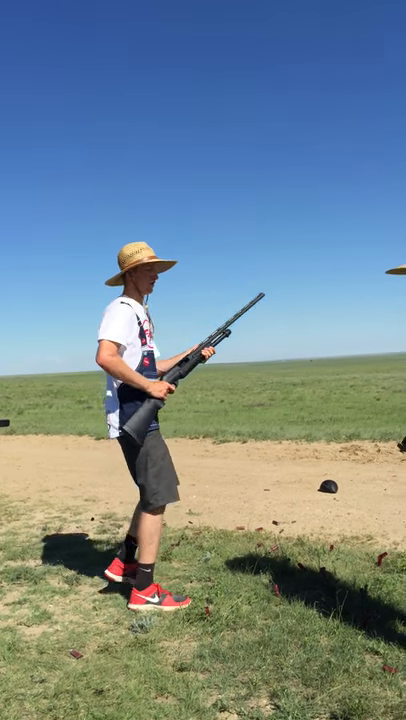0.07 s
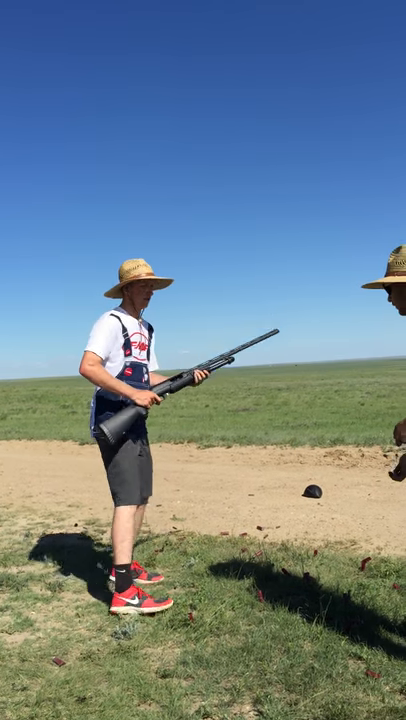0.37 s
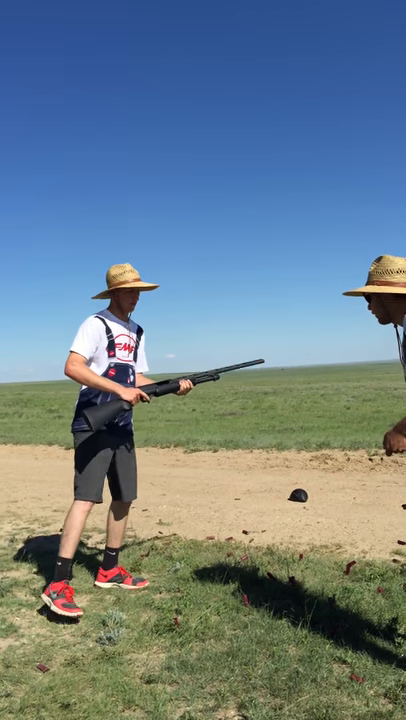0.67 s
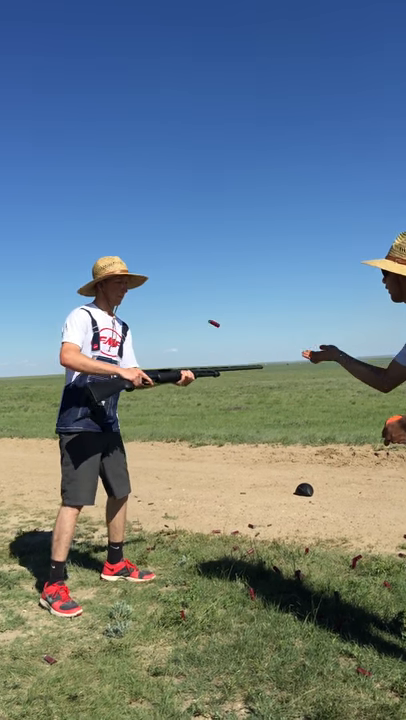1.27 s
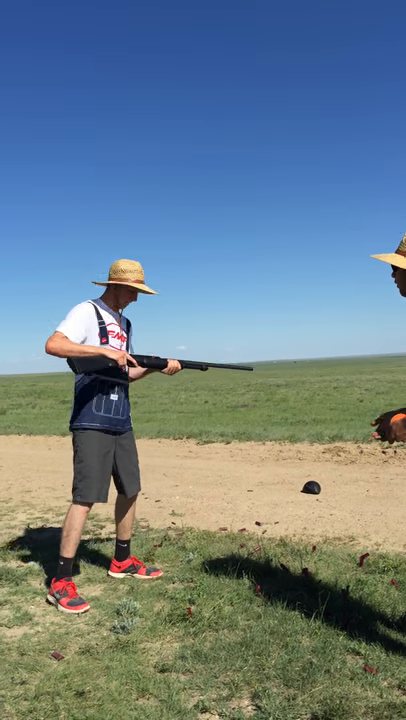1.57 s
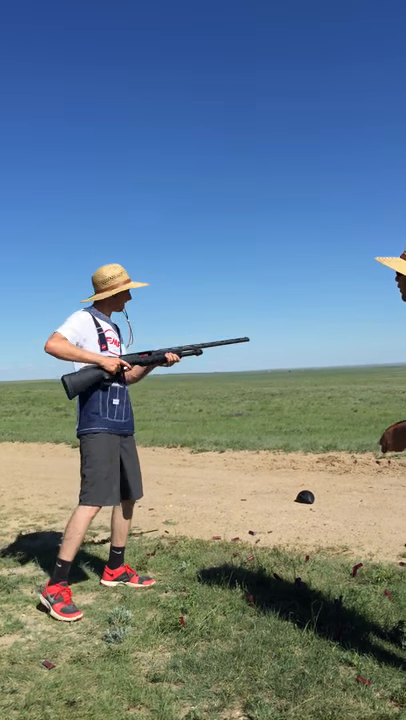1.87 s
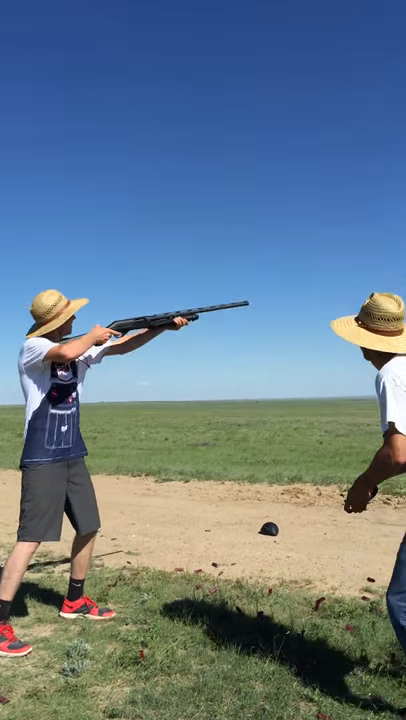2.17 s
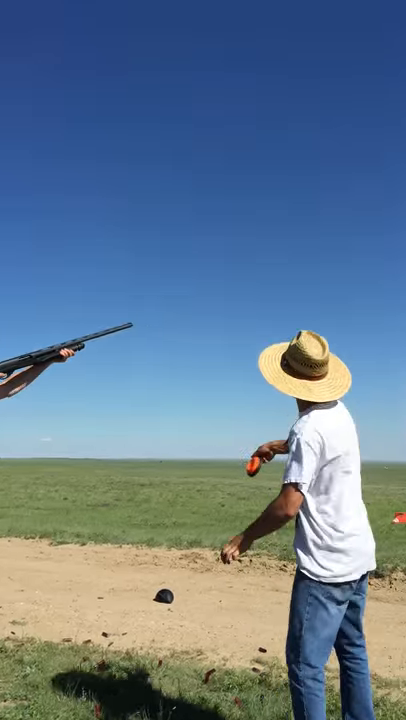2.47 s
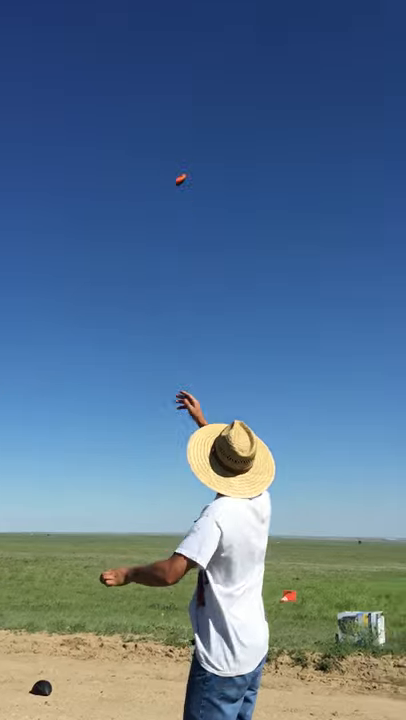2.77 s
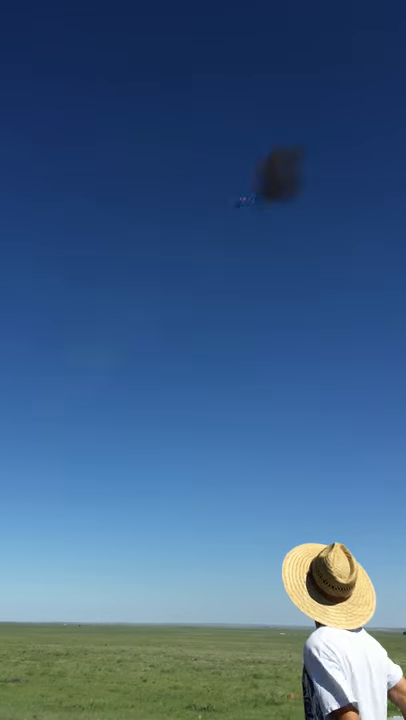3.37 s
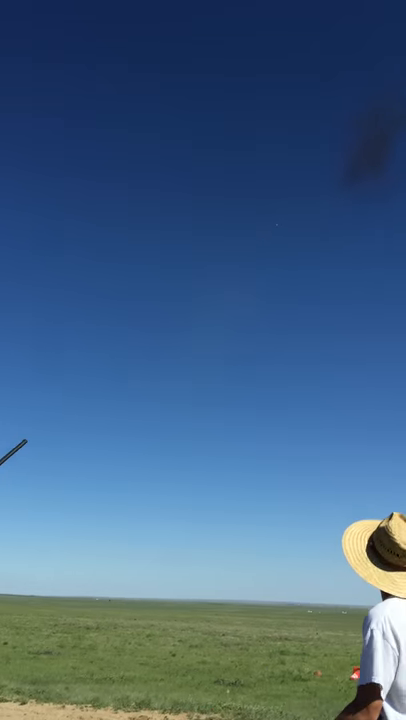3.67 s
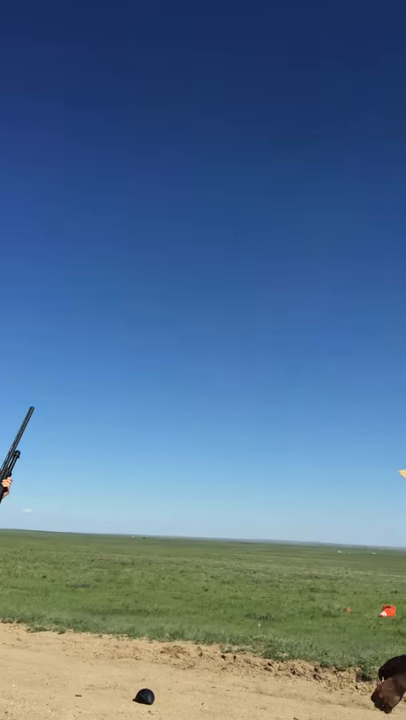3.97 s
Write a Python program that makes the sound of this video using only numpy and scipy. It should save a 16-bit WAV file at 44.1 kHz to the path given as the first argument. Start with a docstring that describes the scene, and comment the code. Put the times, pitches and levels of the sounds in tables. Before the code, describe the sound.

A single shotgun blast overloads a microphone a few steps away in an open field. Low wind gusts come first, then loading clicks and a sharp metal clack, a pause, and the shot with its faint echo.

```python
"""Open grassland: a shotgun is loaded and fired a few steps from a small microphone.
Wind buffets the microphone throughout; shoes and sleeves rustle. A plastic shell scrapes and clacks into
the port, the bolt slides forward and slams shut with a short steel ring. One shot overloads the
microphone, and its echo drifts back over the field, losing treble to the air."""
import sys
import numpy as np
from scipy import signal
from scipy.fft import rfft, irfft
from scipy.io import wavfile
from scipy.ndimage import uniform_filter1d, map_coordinates

SR = 44100
rng = np.random.default_rng(int(sys.argv[2]) if len(sys.argv) > 2 else 0)


def materialize(psi):
    """Save the field psi as 16-bit PCM at rate SR to the path in sys.argv[1].

    A 1-D psi becomes a single channel; in a 2-D psi each row is a channel.
    """
    bounded = np.clip(np.atleast_2d(psi).T, -1, 1)
    quanta = np.round(bounded * 32767).astype(np.int16)
    wavfile.write(sys.argv[1], SR, quanta)


N = 176400
TIME_S = np.arange(N) / SR
STRIKE_TIME_S = np.arange(SR // 2) / SR


def amp(db):
    """Decibels to gain."""
    return 10 ** (np.asarray(db) / 20)


def unit(x):
    """Scale to rms 1."""
    return x / np.sqrt(np.mean(x ** 2) + 1e-20)


def curve(rows):
    """Gain per sample from rows of time_s, level_db."""
    return amp(np.interp(TIME_S, *np.transpose(rows)))


def wobble(rate_hz):
    """Smooth random curve with knots at rate_hz."""
    knots = rng.standard_normal(int(N * rate_hz / SR) + 4)
    return map_coordinates(knots, [TIME_S * rate_hz])


def noise(spectrum, tilt_db_per_oct=0, pivot_hz=1000, size=N):
    """Noise of rms 1 from rows of freq_hz, level_db, tilted above the pivot."""
    octave = np.log2(np.fft.rfftfreq(size, 1 / SR) + 1)
    freq_hz, level_db = np.transpose(spectrum)
    shape_db = np.interp(octave, np.log2(freq_hz), level_db)
    tilt_db = tilt_db_per_oct * np.maximum(octave - np.log2(pivot_hz), 0)
    return unit(irfft(rfft(rng.standard_normal(size)) * amp(shape_db + tilt_db), size))


def swell(peak_s, half_width_s):
    """Gaussian envelope."""
    return np.exp(-((TIME_S - peak_s) / half_width_s) ** 2)


def burst(peak_s, rise_db_per_s, fall_db_per_s, hold_s=0):
    """Rise, hold, fall envelope."""
    t = TIME_S - peak_s
    return amp(rise_db_per_s * np.minimum(t, 0) - fall_db_per_s * np.maximum(t - hold_s, 0))


def decay(t60_s):
    """Exponential decay after a strike."""
    return 1000 ** (-STRIKE_TIME_S / t60_s)


def partial(pitch_hz, level_db):
    """Sine with random phase and slight level spread."""
    gain = amp(level_db + rng.normal(0, 1.3))
    return gain * np.sin(2 * np.pi * (pitch_hz * STRIKE_TIME_S + rng.random()))


def add(out, start_s, x):
    """Mix x into out at start_s."""
    i = round(start_s * SR)
    out[i:i + len(x)] += x[:max(N - i, 0)]


# Wind strength, three spans before the shot and one after: time_s, level_db
EARLY_GUSTS = [
    [(0.0, -26), (0.174, -16), (0.386, -37), (0.408, -16), (0.456, -28), (0.486, -15.5), (0.6, -33),
     (0.658, -23), (0.86, -35.5), (0.946, -26.5), (0.974, -40.5), (1.064, -24), (1.09, -37), (1.228, -27.5),
     (1.324, -57), (1.344, -35), (1.4, -47)],
    [(1.42, -42), (1.448, -33), (1.61, -21), (1.666, -30), (1.726, -17), (1.802, -33), (1.848, -18.5),
     (1.928, -21), (1.948, -32), (2.002, -25), (2.104, -26), (2.154, -35.5), (2.246, -25.5), (2.274, -32),
     (2.35, -23), (2.408, -49), (2.44, -46)],
    [(2.46, -32), (2.48, -27.5), (2.52, -38.5), (2.564, -27), (2.592, -40.5), (2.624, -30), (2.734, -52),
     (2.826, -37), (2.926, -57.5), (2.962, -39), (3.05, -60), (3.086, -37), (3.148, -29), (3.232, -42),
     (3.296, -30), (3.314, -38), (3.38, -42)],
]
LATE_GUSTS = [(3.55, -40.5), (3.62, -51), (3.65, -42.5), (3.72, -50.5), (3.775, -42), (3.82, -49.5),
              (3.88, -41), (3.94, -40), (4, -48)]
# Wind spectra: freq_hz, level_db
RUMBLE_SPECTRUM = [(20, -28), (40, -7), (62, 1), (100, -1), (160, -10), (230, -21), (330, -40), (550, -68),
                   (1500, -100), (4000, -120)]
FLUTTER_SPECTRUM = [(60, -16), (170, -0.5), (250, -3), (380, -19.5), (600, -45), (1200, -80), (4000, -120)]
AIR_SPECTRUM = [(410, -29), (700, 0.5), (3900, -5), (4920, -8), (6520, -9), (12100, -13.5), (15000, -18.5)]


def wind(flutter_db=-42.5, flutter_depth_db=5.5, air_db=-71):
    """Low buffeting on the microphone, fluttering harder in gusts, over faint open-air hiss."""
    strength = curve(np.concatenate([*EARLY_GUSTS, LATE_GUSTS]))
    rumble = noise(RUMBLE_SPECTRUM)
    local_power = np.abs(uniform_filter1d(rumble ** 2, size=3000))
    steady_rumble = unit(rumble / np.sqrt(local_power + 0.1))
    flicker = amp(flutter_depth_db * np.tanh(wobble(45)))
    flutter = unit(strength ** 1.35 * flicker * noise(FLUTTER_SPECTRUM))
    return strength * steady_rumble + amp(flutter_db) * flutter + amp(air_db) * noise(AIR_SPECTRUM)


# Wind eddies: peak_s, level_db, half_width_s, tilt_db_per_oct
EDDY_PUFFS = [(0.009, -32, 0.01, -1.5), (0.068, -27, 0.004, 1.5), (0.089, -20.5, 0.0051, -2),
              (0.137, -21, 0.0025, 7.5), (0.153, -26, .024, -5), (0.261, -33, 0.014, -5.5),
              (0.423, -24, 0.0045, 2), (0.586, -30.5, .012, -3), (0.651, -41, 0.0063, -2),
              (0.684, -40.5, 0.0086, -7.5), (0.725, -33, 0.0044, -24), (0.774, -29.5, .006, -7.5),
              (0.801, -31, 0.012, -5.5), (0.932, -30, 0.0067, -11.5), (1.47, -40.5, 0.032, -5),
              (1.541, -36.5, 0.01, -5), (1.596, -28, 0.0051, -6.5), (1.684, -27.5, 0.0093, -1.5),
              (1.708, -41, 0.0058, 3), (1.912, -22, 0.0049, -2), (1.991, -23.5, 0.0047, 1),
              (2.033, -20, .012, -1.5), (2.178, -30, 0.0055, 3), (2.197, -29.5, 0.01, 3.5),
              (2.227, -22.5, 0.0078, 1), (2.239, -16.5, 0.0071, -0.5), (2.316, -32, 0.01, 7),
              (2.347, -27.5, 0.019, 1.5), (2.465, -39.5, 0.0085, -9), (2.561, -28, 0.0037, -6.5),
              (2.622, -35.5, 0.0049, -2), (3.131, -34, 0.0044, -12), (3.158, -31, 0.0048, -8),
              (3.291, -37, 0.012, -1)]
# Eddy spectrum: freq_hz, level_db
EDDY_SPECTRUM = [(40, -21.5), (120, -3), (250, 1), (450, -7), (650, -20), (1000, -38), (2000, -72),
                 (5000, -125)]


def eddies():
    """Sharp eddies hit the microphone as brief puffs, brighter than the rumble."""
    out = np.zeros(N)
    for peak_s, level_db, half_width_s, tilt_db_per_oct in EDDY_PUFFS:
        envelope = swell(peak_s, half_width_s)
        turbulence = noise(EDDY_SPECTRUM, tilt_db_per_oct, pivot_hz=314, size=16384)
        puff = envelope * np.resize(turbulence, N)
        out += amp(level_db) * puff * np.linalg.norm(envelope) / np.linalg.norm(puff)
    return out


# Steps, sleeves, dry ticks: peak_s, level_db, half_width_s, resonance_hz
RUSTLE_EVENTS = [(0.322, -53, 0.0047, 1700), (0.51, -68.5, 0.047, 3380), (0.529, -46.5, 0.0014, 3200),
                 (2.358, -60, 0.035, 10100), (2.787, -50.5, 0.0033, 3000), (2.822, -51.5, 0.0033, 2210),
                 (2.877, -52, 0.027, 1284), (2.97, -59.5, 0.031, 1597), (3.302, -34, .0012, 3160),
                 (3.349, -59.5, 0.089, 3020)]
# Brushing spectrum: freq_hz, level_db
BRUSH_SPECTRUM = [(200, -13), (800, 3.5), (1700, 0.5), (4000, -2.5), (7000, -8.5), (11000, -10),
                  (15000, -13.5)]


def rustles(rough_db=4, resonance_db=8.5, resonance_width_oct=0.3):
    """Shoes in dry grass, moving clothes and small ticks, each with one broad resonance."""
    freq_hz = np.geomspace(200, 15000, num=60)
    brush_hz, brush_db = np.transpose(BRUSH_SPECTRUM)
    base_db = np.interp(np.log(freq_hz), np.log(brush_hz), brush_db)
    grain = unit(amp(rough_db * np.tanh(wobble(700))))
    out = np.zeros(N)
    for peak_s, level_db, half_width_s, resonance_hz in RUSTLE_EVENTS:
        bump_db = resonance_db * np.exp(-(np.log2(freq_hz / resonance_hz) / resonance_width_oct) ** 2)
        spectrum = np.column_stack([freq_hz, base_db + bump_db])
        out += amp(level_db) * swell(peak_s, half_width_s) * noise(spectrum)
    return grain * out


# Shell friction: time_s, level_db
SHELL_LEVEL = [(1.62, -81), (1.65, -58), (1.7, -66), (1.73, -60), (1.78, -71), (1.83, -60.5), (1.87, -48),
               (1.91, -58), (1.95, -75)]
# Shell spectrum: freq_hz, level_db
SHELL_SPECTRUM = [(400, -30), (750, -12), (950, -3), (1200, -8), (1600, 0), (2100, -9), (2600, 1),
                  (3200, -11), (6000, -14), (14000, -28)]


def shell_scrape(rough_db=4.5):
    """The plastic shell rubs into the port."""
    return curve(SHELL_LEVEL) * unit(noise(SHELL_SPECTRUM) * amp(rough_db * wobble(200)))


# Bolt friction: time_s, level_db
BOLT_LEVEL = [(1.62, -89), (1.65, -59.5), (1.78, -71.5), (1.87, -53), (1.93, -64), (1.955, -51.5),
              (1.975, -36), (2.01, -34.5), (2.04, -29), (2.075, -34.5), (2.11, -57), (2.2, -67), (2.3, -92)]
# Metal contact spectrum, sliding or struck: freq_hz, level_db
CONTACT_SPECTRUM = [(200, -19.5), (700, -8.5), (1400, -2), (2600, 0), (4500, -3.5), (6500, -4),
                    (9000, -6.5), (15000, -18.5)]


def bolt_slide(rough_db=4):
    """Steel catches on steel, louder as the bolt gathers speed."""
    friction = noise(CONTACT_SPECTRUM, tilt_db_per_oct=-3.5)
    return curve(BOLT_LEVEL) * unit(friction * amp(rough_db * wobble(500)))


# Contacts of shell, action and gun: start_s, level_db, tilt_db_per_oct, pitch_hz
CONTACTS = [(1.6255, -22.5, -2, 3036), (1.631, -24, -8, 3650), (1.6363, -26, 1, 9040),
            (1.6711, -37, 0.5, 7150), (1.6945, -43.5, -11, 1630), (1.726, -39, -4.5, 2620),
            (1.753, -51, -12.5, 2500), (1.7957, -44.5, -8, 2530), (1.8294, -45.5, -12, 2560),
            (1.853, -40.5, -1.5, 6540), (1.864, -36.5, 1.5, 6500), (1.875, -35, -4.5, 2580),
            (1.898, -45.5, 0, 5950), (1.9365, -39, -3.5, 4030), (1.955, -44, 1, 9000),
            (1.9629, -30.5, 4, 6650), (2.035, -22.5, 0.5, 3620), (2.048, -15.5, 1.5, 4350),
            (2.0598, -7, 1, 2476), (2.0664, -7.5, 3.5, 1497), (2.0718, -4, 0, 6400),
            (2.085, -22.5, 1.5, 6940), (2.628, -53, 5.5, 4730), (3.314, -50.5, 0.5, 3530),
            (3.389, -52, 1, 2780), (3.4188, -26.5, 0.5, 2520), (3.4233, -28.5, 1, 6000),
            (3.957, -51.5, 0.5, 1510), (3.973, -41, -3, 1466), (3.987, -33.5, 0.5, 4300),
            (3.994, -34.5, 1, 9100)]
# Action resonances: pitch_hz, width_hz (limited to 60-200 in use), level_db
ACTION_MODES = [(1576, 160, 2), (2700, 210, 4.5), (3800, 33, -3.5), (6270, 71, -3), (7130, 100, -4.5),
                (6830, 62, -11.5), (8060, 63, -10), (11660, 49, -11)]


def clacks(crack_db=-2.5, scatter_db=-20, body_db=-7, part_db=-0.5, attack_s=0.0003):
    """Each contact cracks and briefly rings both the action and the struck part."""
    out = np.zeros(N)
    attack = 1 - np.exp(-STRIKE_TIME_S / attack_s)
    crack_envelope = decay(t60_s=0.024) + amp(scatter_db) * decay(t60_s=0.11)
    for start_s, level_db, tilt_db_per_oct, pitch_hz in CONTACTS:
        crack = noise(CONTACT_SPECTRUM, tilt_db_per_oct, size=len(STRIKE_TIME_S)) * crack_envelope
        body = np.zeros_like(crack)
        for mode_hz, width_hz, mode_db in ACTION_MODES:
            shifted_hz = mode_hz * np.exp(rng.normal(0, 0.033))  # varies with the contact point
            tilted_db = mode_db + tilt_db_per_oct * np.log2(mode_hz / 4000)
            damping = np.exp(-np.pi * np.clip(width_hz, 60, 200) * STRIKE_TIME_S)
            body += partial(shifted_hz, tilted_db) * damping
        part = partial(pitch_hz, part_db) * decay(t60_s=0.027)
        clack = amp(crack_db) * crack + amp(body_db) * body + part
        add(out, start_s, amp(level_db) * attack * clack)
    return out


# Steel receiver modes: pitch_hz, level_db, t60_s
RECEIVER_MODES = [(2620, -14.5, 0.083), (3730, -16.5, .08), (5560, -9, 0.2), (5561, -16, .18),
                  (6130, -7, .066), (6360, 0, 0.064), (8400, -17, 0.15), (9211, -19, .12),
                  (13250, -14, .067)]


def receiver_ring(start_s=2.072, gain_db=-22.5):
    """The locking bolt sets the steel receiver ringing."""
    out = np.zeros(N)
    for pitch_hz, level_db, t60_s in RECEIVER_MODES:
        add(out, start_s, partial(pitch_hz, level_db) * decay(t60_s))
    return amp(gain_db) * out


SHOT_S = 3.4425
# Shot spectra: freq_hz, level_db
ONSET_SPECTRUM = [(40, -20.5), (300, -0.5), (700, -8.5), (1300, 1), (2000, -4), (2900, -10.5),
                  (3500, -38.5), (8000, -57)]
BLAST_SPECTRUM = [(25, -8), (70, -1), (130, 2.5), (200, 5), (320, -4.5), (450, 0.5), (700, -2), (950, -4.5),
                  (1800, -2), (3200, -7.5), (6000, -13.5), (10000, -15.5), (15000, -24)]


def shot(rise_db_per_s=4501.5, swing_s=3.459, swing_hz=70):
    """A dull swell, then a two-surge blast on a slow pressure swing, scattered by nearby ground."""
    onset_envelope = amp(-7.5) * burst(3.434, rise_db_per_s=2299.5, fall_db_per_s=1002, hold_s=0.0049)
    onset = onset_envelope * noise(ONSET_SPECTRUM)
    first_surge = amp(4.5) * burst(SHOT_S, rise_db_per_s, fall_db_per_s=1002, hold_s=0.0049)
    second_surge = amp(-4.5) * burst(3.464, rise_db_per_s, fall_db_per_s=856)
    blast = (first_surge + second_surge) * noise(BLAST_SPECTRUM)
    swing_envelope = amp(-1.5) * swell(swing_s, half_width_s=0.012)
    swing = swing_envelope * -np.cos(2 * np.pi * swing_hz * (TIME_S - swing_s))
    scatter_envelope = amp(-14) * burst(SHOT_S, rise_db_per_s, fall_db_per_s=286.5)
    scatter = scatter_envelope * noise(BLAST_SPECTRUM, tilt_db_per_oct=-2)
    return onset + blast + swing + scatter


# Return from the field: time_s, level_db
ECHO_ENVELOPE = [(3.45, -90), (3.5, -51), (3.56, -51.5), (3.62, -59.5), (3.69, -53), (3.74, -52.5),
                 (3.785, -59.5), (3.826, -45.5), (3.85, -55), (3.9, -64.5), (4, -54)]
# Echo spectrum: freq_hz, level_db
ECHO_SPECTRUM = [(100, -4), (500, 1), (1100, -2.5), (2500, 0.5), (4200, 2), (7000, -3.5), (10000, -6),
                 (15000, -10.5)]


def echo(loss_at_10khz_db_per_s=33.5):
    """The field scatters the shot back; the longer the path, the more treble the air absorbs."""
    freq_hz, time_s, frames = signal.stft(noise(ECHO_SPECTRUM), SR, nperseg=256)
    travel_s = np.maximum(time_s - SHOT_S, 0)
    loss_db = loss_at_10khz_db_per_s * travel_s * (freq_hz[:, None] / 10000) ** 2
    _, roll = signal.istft(frames * amp(-loss_db), SR, nperseg=256)
    return curve(ECHO_ENVELOPE) * roll[:N]


def scene():
    """Mono sum at the microphone."""
    background = wind() + eddies() + rustles()
    handling = shell_scrape() + bolt_slide() + clacks() + receiver_ring()
    return (background + handling + shot() + echo())[None]


def record(dry, clip_hardness=6, cutoff_hz=15800):
    """The microphone input clips on the shot and is band-limited."""
    clipped = dry / (1 + np.abs(dry) ** clip_hardness) ** (1 / clip_hardness)
    lowpass = signal.firwin(101, cutoff_hz, fs=SR)
    return signal.fftconvolve(clipped, lowpass[None], mode="same")


dry = scene()
out = record(dry)
materialize(out)
```